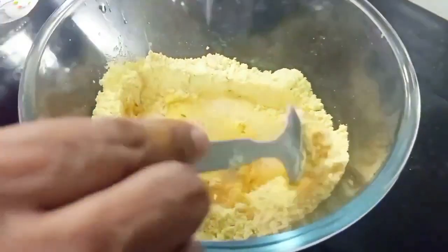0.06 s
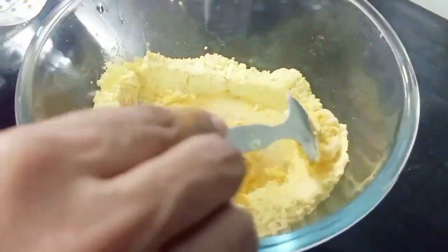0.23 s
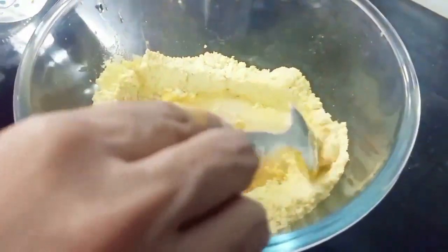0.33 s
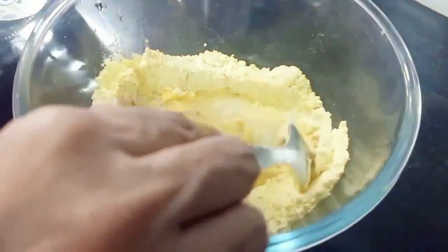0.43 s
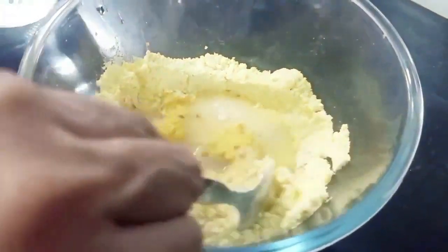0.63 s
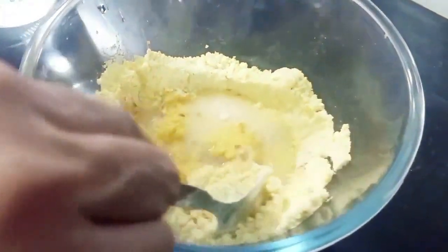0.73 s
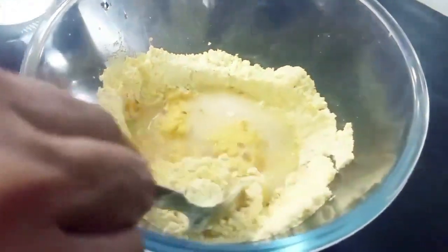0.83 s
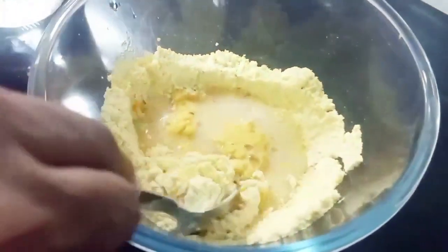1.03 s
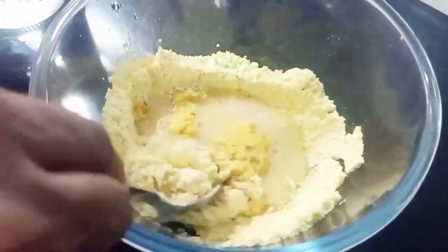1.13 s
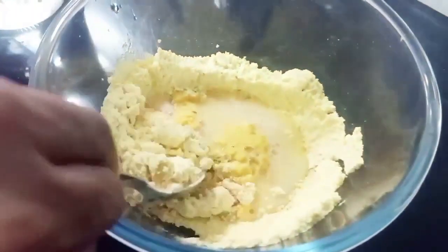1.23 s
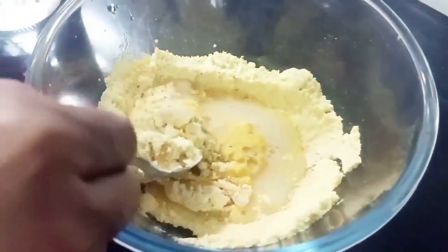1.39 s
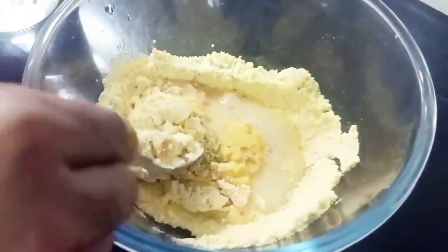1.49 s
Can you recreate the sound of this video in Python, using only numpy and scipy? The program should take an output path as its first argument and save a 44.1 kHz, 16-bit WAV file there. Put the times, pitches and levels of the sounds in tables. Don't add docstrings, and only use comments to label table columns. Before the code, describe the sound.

Close stereo pickup of a spoon in a glass bowl: bright ringing clank, quick dragging bounce, gentle gritty flour scraping, a light tick and a duller second knock, over low engine drone in a reflective kitchen.

```python
import sys
import numpy as np
from scipy import signal
from scipy.fft import rfft, irfft, next_fast_len
from scipy.io import wavfile
from scipy.ndimage import uniform_filter1d, map_coordinates

SR = 44100
rng = np.random.default_rng(int(sys.argv[2]) if len(sys.argv) > 2 else 0)


def attenuation_scalar(level_db):
    decades = np.asarray(level_db, float) / 20
    return 10 ** decades


def store_wav(level_fs):
    pcm = np.round(np.clip(np.atleast_2d(level_fs), -1, 1) * 32767)
    wavfile.write(sys.argv[1], SR, pcm.T.astype(np.int16))


N = 68355


def unit(x):
    return x / np.sqrt(np.mean(x ** 2) + 1e-20)


def along(points, hz):
    f, v = np.transpose(points)
    return np.interp(np.log(hz + 1), np.log(f + 1), v)


def curve(rows):
    s, v = np.transpose(rows)
    return np.interp(np.arange(N) / SR, s, v)


def envelope(start, full, hold, end):
    return curve([(start, 0), (full, 1), (hold, 1), (end, 0)])


def wobble(rate):
    knots = rng.standard_normal(400)
    steps = map_coordinates(knots, [np.arange(0, N + 32, 32) * rate / SR])
    return steps.repeat(32)[:N]


def smooth(rate):
    return uniform_filter1d(wobble(rate), size=32)


def filtered(x, response):
    m = next_fast_len(N + SR // 2)
    return irfft(rfft(x, m) * response(np.fft.rfftfreq(m, 1 / SR)), m)[..., :N]


# (frequency [Hz], left-right likeness [-1 to 1])
PORT_LIKENESS = [(60, 1), (160, 0.91), (260, 1), (950, 0.2), (3770, -0.043), (15000, 0.18)]


def spread(pair, spectrum):
    def mid_side(hz):
        angle = np.arccos(np.clip(along(PORT_LIKENESS, hz), -1, 1)) / 2
        return attenuation_scalar(along(spectrum, hz)) * [np.cos(angle), np.sin(angle)]

    mid, side = filtered(pair, mid_side)
    return unit(np.array([mid + side, mid - side]))


def noise_pair():
    return rng.standard_normal((2, N))


def dying(colour, t60s, channels):
    hz, t, z = signal.stft(rng.standard_normal((channels, SR)), SR, nperseg=128)
    level_db = along(colour, hz)[:, None] - 60 * t / along(t60s, hz)[:, None]
    tail = signal.istft(z * attenuation_scalar(level_db), SR, nperseg=128)[1][:, :SR]
    return tail / np.linalg.norm(tail[0])


# (frequency [Hz], level [dB per Hz])
AIR_COLOUR = [(200, 5), (500, 5.5), (2500, 6), (3300, -3), (4600, -14), (7300, -7), (7900, -52),
              (15500, -50.5)]


def air():
    level_db = -62.5 + 0.79 * smooth(1.0)
    return attenuation_scalar(level_db) * spread(noise_pair(), AIR_COLOUR)


# (time [s], level [dB])
ENGINE_LEVEL = [(0, -52.5), (.03, -46.5), (.22, -46.5), (.5, -46.5), (.65, -47.5), (.92, -48.5), (1.0, -55),
                (1.08, -64.5), (1.13, -54.5), (1.18, -64), (1.3, -56), (1.48, -61.5), (1.55, -61.5)]
# (multiple of the firing rate, level [dB])
FIRING_ORDERS = [(1, -43), (2, -5.5), (3, 3.5), (4, 0), (5, -6.5), (6, -39)]
# (frequency [Hz], level [dB per Hz])
ROAR_COLOUR = [(15, -72), (45, -22), (92, -15.5), (124, -0.5), (260, -16), (330, -36), (400, -23.5),
               (520, -32.5), (880, -120)]


def engine():
    firing_hz = 42.3 * (1 + 0.01 * wobble(8.82))
    turn = 2 * np.pi * np.cumsum(firing_hz) / SR
    tones = 0
    for order, db in FIRING_ORDERS:
        flutter_db = 2.2 * smooth(3.9)
        tones = tones + attenuation_scalar(db + flutter_db) * np.sin(round(order) * turn + 2 * np.pi * rng.random())
    roar = attenuation_scalar(0.5 + 4.0 * smooth(13)) * spread(noise_pair(), ROAR_COLOUR)
    return attenuation_scalar(curve(ENGINE_LEVEL)) * unit(unit(tones) + roar)


# (time [s], level [dB])
SCRAPE_LEVEL = [(0, -64.5), (.25, -64), (.44, -57.5), (.53, -55), (.62, -57), (.8, -60), (1.0, -65),
                (1.1, -72.5), (1.3, -63), (1.55, -68)]
# (frequency [Hz], level [dB per Hz])
GRIT_COLOUR = [(200, -11.5), (400, -7.5), (950, 0), (1650, -14.5), (2400, -1), (3500, -16.5), (7000, -38),
               (9000, -72.5)]
# (frequency [Hz], width [Hz], level [dB])
BOWL_MODES = [(210, 13, 8), (300, 17, 20.5), (590, 25, -18.5), (638, 28, -3.5), (828, 3.33, 29),
              (1382, 6.6, 23.5), (1952, 7.5, 18.5), (2500, 15, -16), (3280, 21, -25)]
# (time [s], level [dB])
RUSTLE_LEVEL = [(0, -100), (.43, -106), (.45, -76.5), (.53, -71.5), (.56, -82), (1.55, -100)]
# (frequency [Hz], level [dB per Hz])
SLIDING_COLOUR = [(3000, -51), (4500, -31.5), (6500, 12), (8000, 1.5), (8800, -51)]


def stirring():
    grains_per_s, grain_db, sing_db = 1500, 2.5, -1
    size_db = grain_db * np.minimum(rng.exponential(size=(2, N)), 2)
    clicks = attenuation_scalar(size_db) * noise_pair() * (rng.random((2, N)) < grains_per_s / SR)
    grains = unit(clicks) + 1.2 * noise_pair()

    def glass(f):
        return sum(attenuation_scalar(db) * 1j * f * w / (c * c - f * f + 1j * f * w) for c, w, db in BOWL_MODES)

    sing = unit(filtered(grains[::-1] * attenuation_scalar(3 * wobble(12)), glass))
    level = attenuation_scalar(curve(SCRAPE_LEVEL) + 0.5 * smooth(3.8))
    scrape = level * (spread(grains, GRIT_COLOUR) + attenuation_scalar(sing_db) * sing)
    rustle = attenuation_scalar(curve(RUSTLE_LEVEL)) * spread(noise_pair(), SLIDING_COLOUR)
    return scrape + rustle


# (time [s], length [s], frequency [Hz], level [dB])
SQUEAK_TONES = [(0.269, 0.02, 1400, -37), (0.273, 0.018, 559, -28.5), (1.345, 0.018, 639, -46),
                (0.498, 0.051, 2080, -59), (0.515, 0.022, 650, -46), (0.521, 0.013, 916, -50.5),
                (0.523, .04, 560, -59), (0.564, 0.13, 955, -59), (0.585, 0.028, 1300, -78),
                (0.734, 0.12, 990, -74), (0.744, 0.087, 868, -72), (0.76, 0.1, 286, -59),
                (0.424, 0.19, 1360, -59.5), (0.942, 0.1, 1308, -63.5), (1.115, 0.11, 1680, -70.5),
                (1.248, 0.026, 2850, -66), (1.422, 0.011, 2660, -58.5)]


def squeaks():
    t = np.arange(N) / SR
    out = np.zeros((2, N))
    for s, length, hz, db in SQUEAK_TONES:
        level = attenuation_scalar(db + 3.5 + smooth(41.7))
        level = level * envelope(s, s + length / 4, s + length * 3 / 4, s + length)
        phase = 2 * np.pi * hz * t + 0.65 * smooth(26.17)
        port_phase = np.array([[0], [rng.normal(0, 2.1)]])
        out += level * np.sin(phase + port_phase)
    return out


# (frequency [Hz], level [dB per Hz])
JUDDER_COLOUR = [(120, -29), (190, -5.5), (600, 2.5), (1400, -9.5), (1800, -38.5), (4500, -81)]
# (start [s], full [s], hold to [s], end [s])
JUDDER_TIMES = (.31, .315, .385, .43)


def judder():
    level = attenuation_scalar(-37.5 + 6.4 * smooth(89.1)) * envelope(*JUDDER_TIMES)
    return level * spread(noise_pair(), JUDDER_COLOUR)


# (level [dB], t60 [s]), then their (frequency [Hz])
RIM_MODES = [(-0.5, 0.12), (-2.5, 0.14), (-7, 0.2), (-18, 0.34), (2.5, 0.075), (-2.5, 0.16), (-35, 0.1),
             (8.5, 0.11), (-4, 0.14), (-16, 0.17), (-23, 0.067), (-56.5, 0.45), (-30.5, 0.63),
             (-27.5, 0.074)]
RIM_PITCHES = [186, 326, 388, 521, 615, 667, 814, 1110, 1399, 2507, 3795, 4490, 5892, 5966]
# (level [dB], t60 [s]), then (frequency [Hz])
DRAG_MODES = [(0, 0.39), (-5, 0.65), (-13, 0.12), (-3, 0.48), (-26, 0.96), (-9.5, 0.69), (-57, 0.62),
              (-27, 0.094)]
DRAG_PITCHES = [184, 330, 485, 576, 772, 1153, 1556, 3228]
# (level [dB], t60 [s]), then (frequency [Hz])
TOUCH_MODES = [(-5, 1), (1.5, 0.0097), (-29.5, 0.023)]
TOUCH_PITCHES = [673, 1500, 2363]
# (level [dB], t60 [s]), then (frequency [Hz])
WALL_MODES = [(-10.5, 0.16), (-48, 0.033), (-11.5, 0.23), (-15, 0.31), (0, 0.12), (4.5, 0.063),
              (14.5, 0.067), (-9, 0.082), (11, 0.05), (-21, 0.06), (-30, 0.34), (-34, 0.19), (-25.5, 0.14),
              (-24.5, 0.096)]
WALL_PITCHES = [323, 390, 522, 636, 700, 1055, 1153, 1214, 1492, 1604, 2519, 5599, 5992, 6293]
# (frequency [Hz], level [dB], t60 [s])
SPOON_MODES = [
    [(1870, 8, .1), (4075, -6, .18), (3300, -6, .4), (4490, -5, .5), (5647, -13, .19), (5889, 3, .5),
     (6799, 0, .07), (7101, -20, .4), (8247, -12, .11), (9270, -20, .2), (10100, -22, .15),
     (11600, -22, .12), (13300, -28, .12)],
    [(4490, -8, .4), (5930, -3, .4)],
    [(2500, 0, .005), (4300, 8, .007), (6200, 4, .006), (8500, -10, .008)],
    [(2783, -14, .16), (3865, -10, .12), (4200, -14, .08), (4484, -16, .12), (4850, -16, .1),
     (5800, -6, .06), (6869, -16, .07), (7989, -24, .16), (8140, -25, .1), (9991, -24, .09),
     (10150, -27, .07), (11510, -32, .1), (11700, -33, .06)],
]
SPOON_LEVEL = [-31.5, -27, -14, -20]
PHASE_ROUGHNESS = [.2, .4, .15, .65]
# (time after contact [s], length [s], level [dB])
SWELLS = [
    (-.003, 0.03, 5.5),
    (0.039, 0.04, -1),
]
RING_LEVEL = [-12.5, -10, -4, -7.5]
HELD_TIME = [.3, .09, .046, .3]


def ringing(k, t):
    pitches = [RIM_PITCHES, DRAG_PITCHES, TOUCH_PITCHES, WALL_PITCHES][k]
    glass = [RIM_MODES, DRAG_MODES, TOUCH_MODES, WALL_MODES][k]
    modes = [(hz, db, t60) for hz, (db, t60) in zip(pitches, glass)]
    modes += [(hz, SPOON_LEVEL[k] + db, t60) for hz, db, t60 in SPOON_MODES[k]]
    ring = np.zeros(N)
    for hz, db, t60 in modes:
        phase = 2 * np.pi * hz * t + PHASE_ROUGHNESS[k] * smooth(60)
        ring += attenuation_scalar(db - 60 * t / t60) * np.sin(phase)
    if k == 1:
        for at, length, db in SWELLS:
            swell = np.sin(np.pi * np.clip((t - at) / length, 0, 1)) ** 0.45
            ring += attenuation_scalar(db) * swell * np.sin(2 * np.pi * 1345 * t)
    damping_db = 60 * np.maximum(t - HELD_TIME[k], 0) / 0.1
    return ring * attenuation_scalar(RING_LEVEL[k] - damping_db)


# (frequency [Hz], level [dB per Hz])
CRACK_COLOUR = [(1200, -33), (2000, 13.5), (3800, -7), (5100, -16), (6100, 3), (8000, -22.5), (12000, -31),
                (15600, -42.5)]
# (frequency [Hz], t60 [s])
CRACK_DECAY = [(2000, .06), (6000, .045), (14000, .03)]


def shimmer(t, count):
    hz = 1700 * 8 ** rng.random((count, 1))
    size_db = rng.normal(0, 2.8, (count, 1))
    life = rng.random((count, 1)) + 0.5
    fade_db = 60 * t / (2.5 * life * along(CRACK_DECAY, hz))
    level = attenuation_scalar(along(CRACK_COLOUR, hz) + size_db - fade_db) * np.sqrt(hz)
    ring = (level * np.sin(2 * np.pi * hz * t)).sum(0)
    return ring / np.linalg.norm(ring)


# (frequency [Hz], level [dB per Hz])
THUD_COLOUR = [(110, -53.5), (200, -14), (330, -12.5), (800, 8), (1250, 10.5), (1700, 2.5), (3000, -37.5),
               (5000, -65.5)]
# (frequency [Hz], t60 [s])
THUD_DECAY = [(200, 0.3), (1200, 0.029), (3000, 0.072)]


def thud_and_crack(t, thud_db, crack_db):
    thud = attenuation_scalar(thud_db) * dying(THUD_COLOUR, THUD_DECAY, channels=1)[0]
    crack = attenuation_scalar(crack_db) * dying(CRACK_COLOUR, CRACK_DECAY, channels=1)[0]
    out = np.zeros(N)
    out[:SR] += thud * (1 - np.exp(-t[:SR] / 0.0086))
    out[:SR] += crack * (1 - np.exp(-t[:SR] * SR))
    out[:SR // 2] += attenuation_scalar(crack_db) * shimmer(t[:SR // 2], count=240)
    return out * np.sqrt(SR / 100)


BLOW_LEVEL = [3, -3.5, -17.5, -1]
BLOW_PITCH = [680, 592, 1520, 866]


def blow(k, t):
    return attenuation_scalar(BLOW_LEVEL[k]) * np.exp(-np.pi * 300 * t) * np.sin(2 * np.pi * BLOW_PITCH[k] * t)


# (frequency [Hz], left minus right [dB])
EARLY_LEAN = [(100, 10), (330, -12.5), (650, 0), (1200, -2), (2500, -3), (4500, -4), (8000, 12.5)]
# (frequency [Hz], left minus right [dB])
LATE_LEAN = [(100, 0), (330, -2), (1000, 0), (8000, 0)]
LEFT_LAG = [.00022, 0.00016, 0.000096, 0.000357]


def at_ports(dry, k):
    lean = EARLY_LEAN if k < 2 else LATE_LEAN

    def left_right(hz):
        half = attenuation_scalar(along(lean, hz) / 2) * np.exp(-1j * np.pi * hz * LEFT_LAG[k])
        return np.array([half, 1 / half])

    return filtered(dry, left_right)


# (frequency [Hz], t60 [s])
KITCHEN_DECAY = [(150, 0.9), (600, 0.41), (1500, 0.34), (5000, 0.43)]
# (frequency [Hz], level [dB])
KITCHEN_COLOUR = [(200, -3), (1500, -6), (3000, -1.5), (5000, -2.5), (12000, -13)]


def kitchen(dry):
    tail = dying(KITCHEN_COLOUR, KITCHEN_DECAY, channels=2)
    late = np.pad(dry, (130, 0))[None]
    mid, side = signal.fftconvolve(late, tail, axes=1)[:, :N]
    side = filtered(side, lambda hz: (1j * hz / (220 + 1j * hz)) ** 2)
    return np.array([mid + side, mid - side])


# (time [s], gain of the whole contact [dB], thud level [dB], crack level [dB], room level [dB])
CONTACTS = [
    (.2355, -6, -8.5, -26.5, -8.5),
    (.3102, -17.5, -18, -54.5, -8.5),
    (1.2215, -36, -42, -26.5, -2.5),
    (1.2705, -15, -4, -35, -13.5),
]
CONTACT_RISE = [0.0006, 0.00014, 0.00029, 0.0013]


def knocks():
    out = np.zeros((2, N))
    t = np.arange(N) / SR
    for k, (s, db, thud_db, crack_db, room_db) in enumerate(CONTACTS):
        hit = ringing(k, t) + thud_and_crack(t, thud_db, crack_db) + 2 * blow(k, t)
        hit = -attenuation_scalar(db) * (1 - np.exp(-t / CONTACT_RISE[k])) ** 2 * hit
        dry = np.pad(hit, (round(s * SR), 0))[:N]
        dry = filtered(dry, lambda hz: (1j * hz / (110 + 1j * hz)) ** 3)
        out += at_ports(dry, k) + attenuation_scalar(room_db - 1.5) * kitchen(dry)
    return out


def scene():
    return knocks() + judder() + stirring() + squeaks() + engine() + air()


def band_limit(x):
    return signal.sosfilt(signal.butter(12, 15630, fs=SR, output="sos"), x)


def record(dry):
    return band_limit(dry)


dry = scene()
out = record(dry)
store_wav(out)
```